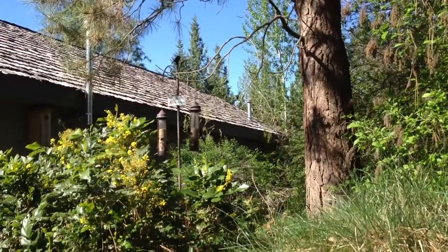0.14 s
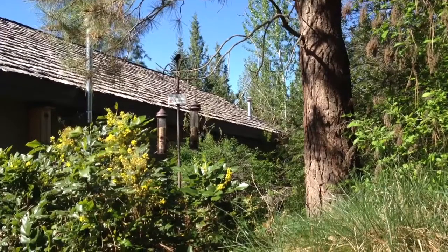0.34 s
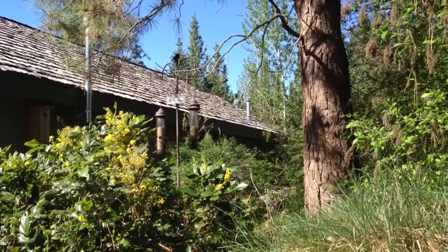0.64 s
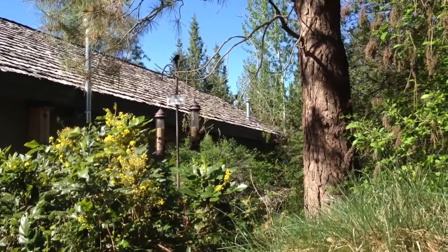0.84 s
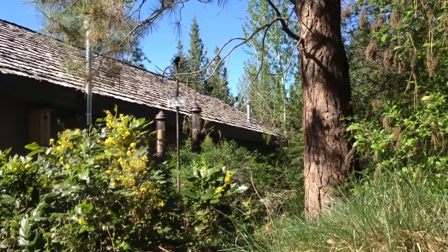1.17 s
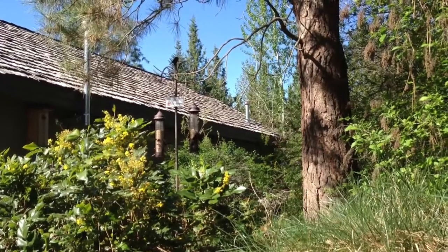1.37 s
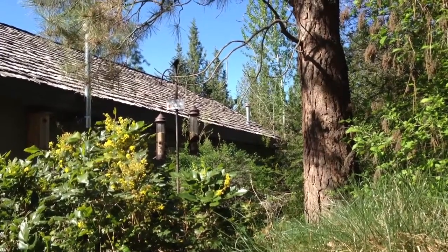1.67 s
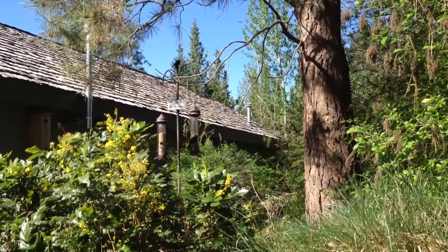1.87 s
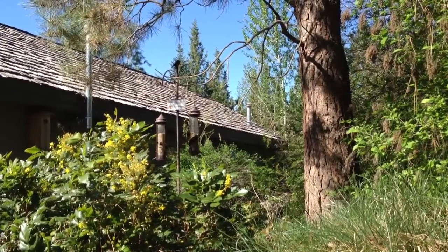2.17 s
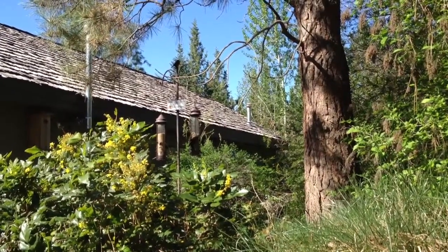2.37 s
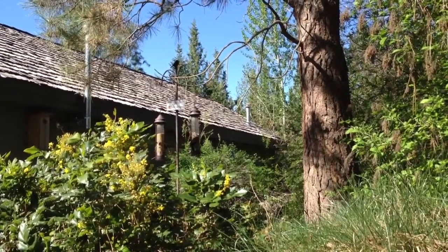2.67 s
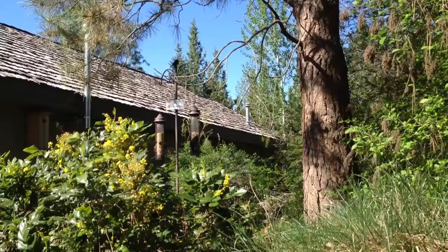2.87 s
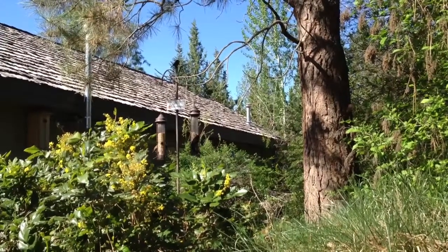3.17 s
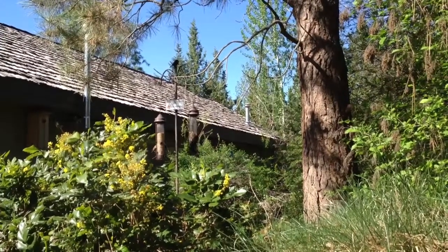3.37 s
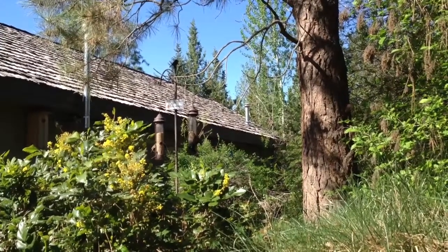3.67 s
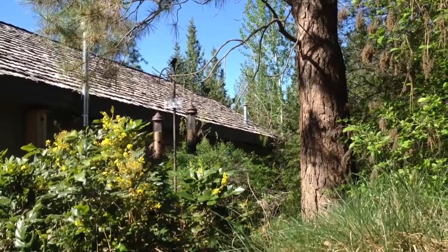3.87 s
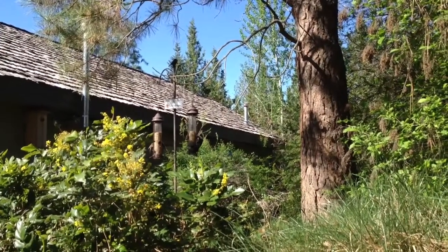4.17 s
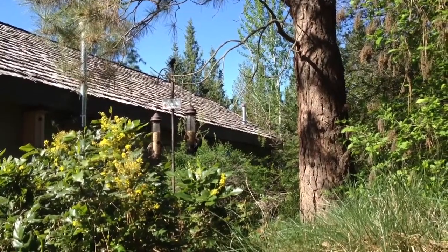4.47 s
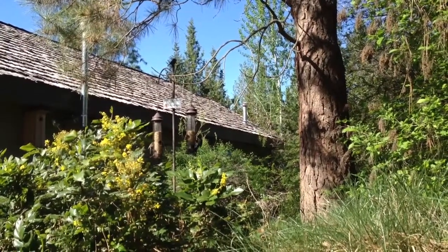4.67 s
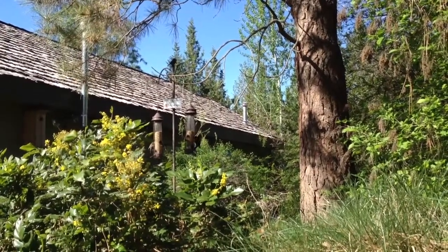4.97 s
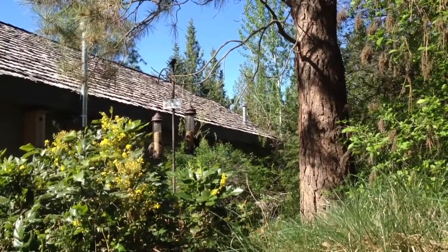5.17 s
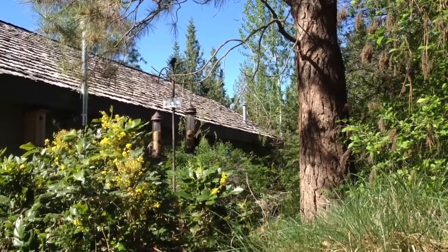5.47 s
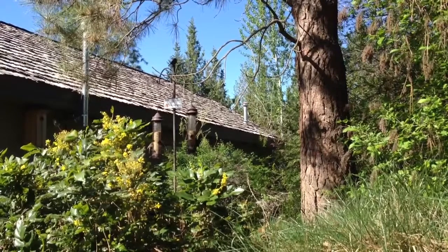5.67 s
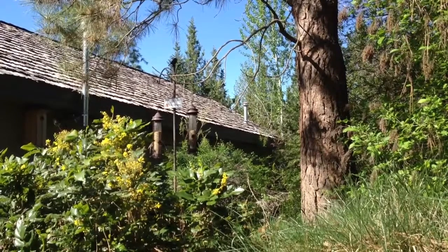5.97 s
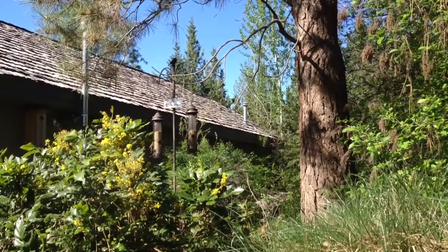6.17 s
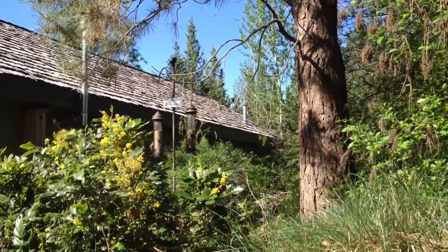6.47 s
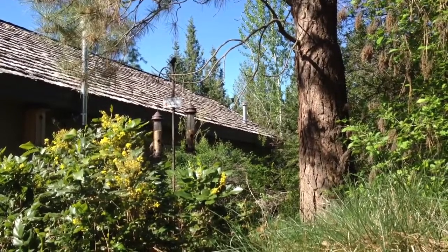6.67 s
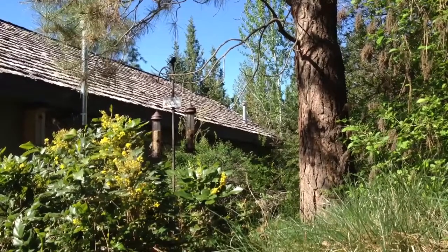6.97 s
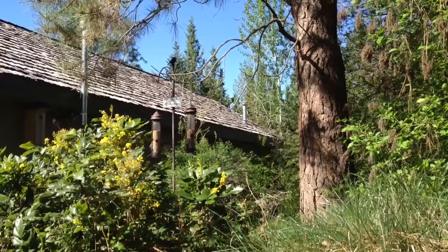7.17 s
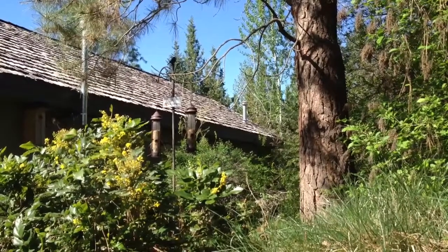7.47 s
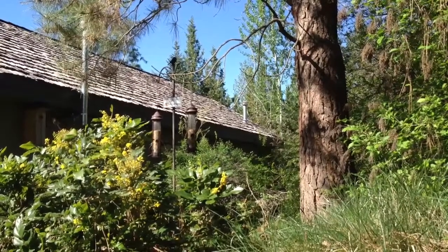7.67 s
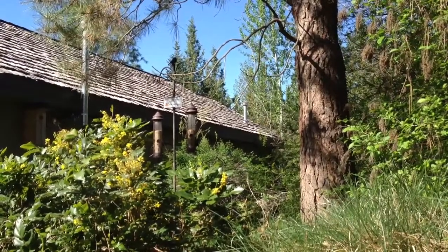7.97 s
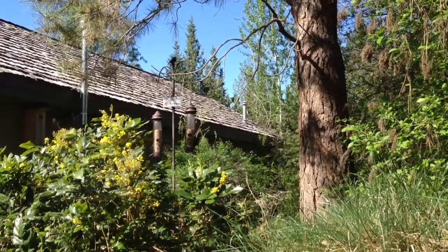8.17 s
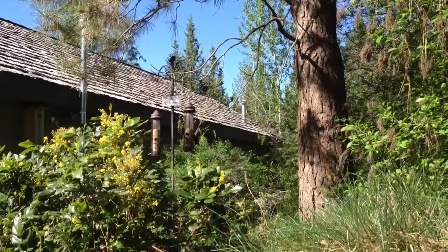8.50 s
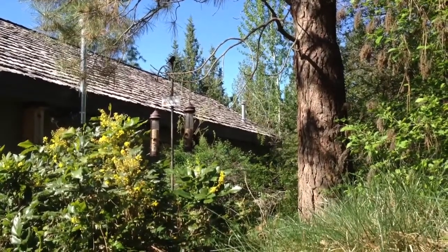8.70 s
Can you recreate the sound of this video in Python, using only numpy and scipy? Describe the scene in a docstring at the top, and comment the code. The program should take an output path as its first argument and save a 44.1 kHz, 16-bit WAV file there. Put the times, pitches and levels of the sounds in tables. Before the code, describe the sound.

Many small songbirds chirp, twitter and whistle in a garden, with a few brief wing flutters over a soft hush of distant air.

```python
"""Songbirds call around garden feeders over a steady hush of distant air, each voice a vibrating syrinx.
Chips, twits and falling "tew" calls open the scene, with wing flutters and two long finch whistles.
From about 2.5 s the twitter thickens while farther birds wheeze and sing low, fluted notes.
After 5 s the whistles return, loudest near 7 s; hard chips, a wheeze and a fluted note come at the end.
Throughout, a house wall, trunks and conifer foliage reflect and scatter the calls."""
import sys
import numpy as np
from scipy import signal
from scipy.fft import rfft, irfft, next_fast_len
from scipy.io import wavfile
from scipy.ndimage import map_coordinates

SR = 44100
rng = np.random.default_rng(int(sys.argv[2]) if len(sys.argv) > 2 else 0)


def unload_audio(sound):
    """Save the sound as a 16-bit wav file, at the path given as the first command line argument."""
    columns = np.transpose(np.atleast_2d(sound))
    # keep every value between -1 and 1, then stretch to whole-number steps
    steps = np.round(np.clip(columns, -1, 1) * 32767)
    wavfile.write(sys.argv[1], SR, steps.astype(np.int16))


N = 389844
TIME = np.arange(N) / SR

# falling "tew" calls: (time [s], level [dB])
TEW_CALLS = [(.26, -54), (1.265, -52), (2.212, -55.5), (2.885, -52), (4.205, -56), (5.182, -52.5),
             (6.127, -53), (7.09, -57), (7.762, -51.5), (8.53, -55.5)]
# harmonics 1-3 of a nearly pure voice: (level [dB])
PURE_HARMONICS = [0, -35, -32]


def from_db(db):
    """Amplitude ratio of a level in decibels."""
    return 10 ** (np.asarray(db) / 20)


def rms_one(x):
    """Normalisation to unit mean power."""
    return x / np.sqrt(np.mean(x ** 2) + 1e-20)


def at_hz(points, hz):
    """Spectral level, interpolated on a log-frequency axis."""
    known_hz, db = np.transpose(points)
    return np.interp(np.log(np.maximum(hz, 1)), np.log(known_hz), db)


def coloured_noise(spectrum):
    """Spectral shaping of white noise, at unit power."""
    gain = from_db(at_hz(spectrum, np.fft.rfftfreq(N, 1 / SR)))
    return rms_one(irfft(rfft(rng.standard_normal(N)) * gain, N))


def waver(t, rate, size=2048):
    """Smooth random modulation of spread about 1, with `rate` new values a second."""
    return map_coordinates(rng.standard_normal(size), [(t - t[0]) * rate], order=3, mode="wrap")


def add(out, t, sound):
    """Superposition of a sound onto the mix, from time t[0]."""
    first = int(round(t[0] * SR))
    part = sound[:max(N - first, 0)]
    out[first:first + len(part)] += part


def read_curve(rows, start=0):
    """Linear interpolation of breakpoints: sample times, then each column."""
    s, *columns = np.transpose(rows)
    end = start + max(s[-1], s[0] + .01)
    t = np.arange(max(int((start + s[0]) * SR), 0), int(end * SR)) / SR
    return t, *[np.interp(t - start, s, c) for c in columns]


def soft_ends(t, edge_s):
    """Raised-cosine gate against clicks."""
    return np.sin(np.pi / 2 * np.clip(np.minimum(t - t[0], t[-1] - t) / edge_s, 0, 1)) ** 2


def distant_air(level_db=-61):
    """Stationary broadband noise: the hush of distant air."""
    # hush spectrum: (frequency [Hz], relative density [dB])
    spectrum = [(25, -39), (45, -22), (69, -16.5), (119, -5.5), (200, -2), (378, -8), (900, -8.5),
                (1900, -10), (3000, -18), (5000, -21), (7500, -24), (9700, -30), (12000, -25), (15400, -26)]
    return from_db(level_db) * coloured_noise(spectrum)


def garden(x, near_db, near_t60, far_db, far_t60, count=30):
    """Reverberation: sparse reflections off ground, wall and trunks, then diffuse scatter from trees."""
    t = TIME[:SR]
    near = np.zeros(SR)
    lags = (np.arange(count) + rng.uniform(.3, 1, count)) * .0028
    near[(lags * SR).astype(int)] = rng.choice([-1, 1], count) * from_db(-60 * lags / near_t60)
    far = rng.standard_normal(SR) * from_db(-60 * t / far_t60) * (1 - np.exp(-t / 0.034))
    response = from_db(near_db) * near / np.linalg.norm(near)
    response += from_db(far_db) * far / np.linalg.norm(far)
    response[0] += 1   # direct path
    return signal.fftconvolve(x, response / np.linalg.norm(response))[:N]


def house_wall(x, lag_s=.0095, echo_db=4.0):
    """Comb filtering by one strong reflection off the wall behind the feeders."""
    return x + from_db(echo_db) * np.interp(TIME - lag_s, TIME, x, left=0)


def beak(x):
    """Radiation from a tiny opening: no bass, one band of overtones favoured, the highest dulled."""
    # transmission of beak and air: (frequency [Hz], gain [dB])
    response = [(300, -69), (1000, 3.5), (8000, -0.5), (9700, -10.5), (11600, 6.5), (13200, 1.5),
                (15000, -3)]
    size = next_fast_len(N + SR // 10)
    gain = from_db(at_hz(response, np.fft.rfftfreq(size, 1 / SR)))
    return irfft(rfft(x, size) * gain, size)[:N]


def syrinx(t, hz, db, rasp, harmonics_db, grit=0, tremor=0.0018, grit_rate=7500):
    """A modulated oscillator: rasp shakes pitch and amplitude, grit spreads sidebands of hiss."""
    rasp_swing, rasp_rate = 0.0707, 900
    shake = rasp * waver(t, rasp_rate)
    phase = 2 * np.pi * np.cumsum(hz * (1 + rasp_swing * shake + tremor * waver(t, 91.9))) / SR
    tone = sum(from_db(h) * np.sin(k * phase) * (k * hz < SR / 2) for k, h in enumerate(harmonics_db, 1))
    turbulence = 1 + grit * waver(t, grit_rate)
    strength = from_db(db + 6 * rasp * waver(t, rasp_rate))
    return np.sqrt(2) * tone * turbulence * strength * soft_ends(t, 0.00022)


def sing(note, rows, **manner):
    """Superposition of one note per row, all in the same manner."""
    out = np.zeros(N)
    for row in rows:
        add(out, *note(*row, **manner))
    return out


def repeated_call(shape, events, harmonics_db, pitch_spread=0.00912, **voice):
    """Transposition: one contour, sung a little higher or lower each time."""
    out = np.zeros(N)
    for start, level_db in events:
        t, hz, db = read_curve(shape, start)
        hz *= 1 + pitch_spread * rng.standard_normal()
        add(out, t, syrinx(t, hz, db + level_db, harmonics_db=harmonics_db, **voice))
    return out


def distant_chorus(count=30, level_db=-65, pitch_hz=4400, spread=0.12, rasp=0.48, answer_within_s=.3):
    """Random linear sweeps: birds deep in the trees answer the tew calls."""
    out = np.zeros(N)
    for k, (when, size, high, bend) in enumerate(rng.uniform(-1, 1, (count, 4))):
        start = TEW_CALLS[k % len(TEW_CALLS)][0] + answer_within_s * (when + 1) / 2
        t, along = read_curve([(0, -1), (0.082 + 0.042 * size, 1)], start)
        hz = pitch_hz * (1 + spread * (high + bend * along))
        add(out, t, syrinx(t, hz, level_db + 3 * size - 8 * along ** 2, rasp, PURE_HARMONICS))
    return out


def wheezes(climb_hz_per_s=57, top_hz=396.5, jitter=0.0397, wander=0.01072, flicker_db=2.0, throb_db=4.0):
    """Source and filter: the throat shapes the harmonics of quickening syrinx pulses; uneven ones rasp."""
    # nasal calls: (time [s], length [s], opening pulse rate [Hz], level [dB], roughness [0-1])
    calls = [(2.551, 0.85, 365, -61.5, .45), (3.254, 0.41, 369, -63.5, 0.54),
             (3.66, .58, 372.5, -54.5, 0.41), (4.19, 0.42, 376, -47.5, 0.92),
             (8.478, .4, 374.5, -56.5, 0.42)]
    # throat resonances: (frequency [Hz], gain [dB])
    throat = [(1200, -21.5), (2000, -14.5), (2350, -10), (2720, 3), (3100, -5), (3450, -1.5), (3850, -1),
              (4300, -2.5), (4800, -5.5), (5500, -10), (6200, -21.5), (11000, -42)]
    out = np.zeros(N)
    for start, length, opening_hz, db, rough in calls:
        t, age = read_curve([(0, 0), (length, length)], start)
        hz = np.minimum(opening_hz + climb_hz_per_s * age, top_hz)
        wobble = 1 + jitter * rough * waver(t, 330) + wander * waver(t, 20)
        phase = 2 * np.pi * np.cumsum(hz * wobble) / SR
        stack = 0
        for k in range(1, 26):
            line_db = at_hz(throat, k * hz) + flicker_db * waver(t, 13.38)
            stack += from_db(line_db) * np.sin(k * phase + rng.uniform(0, 2 * np.pi))
        uneven = from_db(throb_db * rough * waver(t, 165.3))
        add(out, t, rms_one(stack * uneven) * from_db(db) * soft_ends(t, 0.035))
    return out


def mellow_note(start, length, pitch_hz, level_db, rasp, sag, fade_s=.03):
    """A downward glide under a soft envelope; sag is the share of pitch lost."""
    high, low = pitch_hz * (1 + sag / 2), pitch_hz * (1 - sag / 2)
    t, hz, db = read_curve([(-fade_s, high, -22), (0, high, -7), (length / 2, pitch_hz, 0),
                            (length, low, -6), (length + fade_s, low, -22)], start)
    return t, syrinx(t, hz, level_db + db, rasp, PURE_HARMONICS)


def low_song():
    """A farther bird's near-sinusoidal notes, and slides that random modulation makes burry."""
    # fluted notes: (time [s], length [s], pitch [Hz], level [dB], rasp [0-1])
    fluted = [(2.664, 0.057, 1412, -57, 0.093), (2.849, 0.062, 1961, -48, 0.018),
              (3.44, 0.12, 1443, -52, .03), (3.859, 0.118, 1579, -45, 0.063),
              (4.131, 0.085, 1120, -60, 0.54), (4.302, 0.086, 1203, -56.5, .1),
              (4.565, 0.061, 2169, -45.5, 0.28), (4.57, 0.025, 2383, -40.5, .37),
              (4.727, 0.051, 1134, -58, 0.14), (4.985, 0.13, 1209, -50.5, 0.029),
              (8.535, 0.072, 1499, -57.5, 0.32), (8.786, 0.071, 1555, -42.5, 0.033)]
    # down-slides: (time [s], length [s], pitch [Hz], level [dB])
    burrs = [(2.673, .069, 2145, -60.5), (3.378, .054, 2105, -56.5), (3.625, 0.052, 2145, -50.5),
             (6.655, 0.027, 2160, -59.5)]
    return sing(mellow_note, fluted, sag=0.036) + sing(mellow_note, burrs, sag=0.173, rasp=0.57)


def flutters(beat_hz=24):
    """Amplitude-modulated noise: feathers swish once per wing beat."""
    # wing bursts: (time [s], length [s], level [dB])
    bursts = [(0.4, 0.081, -59.5), (0.97, 0.034, -52), (1.845, 0.091, -54.5), (4.033, 0.093, -53.5),
              (7.693, 0.079, -57.5), (8.454, 0.061, -47.5)]
    # feather noise: (frequency [Hz], relative density [dB])
    spectrum = [(150, -46), (600, -10), (1500, -16), (3500, -8.5), (5500, -12), (8000, -18), (10000, -21),
                (14000, -33)]
    swell = sum(from_db(db) * np.sin(np.pi * np.clip((TIME - start) / length, 0, 1))
                for start, length, db in bursts)
    return swell * (1 + .4 * np.sin(2 * np.pi * beat_hz * TIME)) * coloured_noise(spectrum)


def bent_note(start, length, pitch_hz, level_db, rasp, slope, arch, ends_db=-6):
    """A parabolic sweep: slope tilts the pitch, arch lowers both ends, as shares of the middle pitch."""
    # harmonics 1-3: (level [dB])
    harmonics = [0.5, -24.5, -31]
    t, along = read_curve([(0, -1), (length, 1)], start)
    hz = pitch_hz * (1 + slope * along - arch * along ** 2)
    return t, syrinx(t, hz, level_db + ends_db * along ** 2, rasp, harmonics) * soft_ends(t, .002)


def twitter():
    """Frequency modulation gives five kinds of small note, each with its own bend."""
    # rough chirps, arched peeps, thin upsweeps: (time [s], length [s], pitch [Hz], level [dB])
    falls = [(.365, 0.088, 3695, -57.5), (1.456, 0.038, 4240, -58), (2.402, 0.036, 8800, -59),
             (2.555, 0.12, 4010, -52), (3.791, 0.051, 4400, -48), (4.203, 0.021, 4630, -52),
             (5.398, .088, 3470, -59), (6.338, 0.044, 4320, -51), (6.409, 0.068, 2950, -60),
             (7.881, 0.035, 4085, -47), (8.579, 0.032, 3500, -56), (8.677, .025, 4050, -56)]
    rises = [(1.994, 0.1, 4600, -64.5), (2.492, 0.096, 4410, -51), (2.801, .04, 4370, -48),
             (4.142, 0.069, 2170, -56)]
    peeps = [(.077, 0.013, 4920, -46), (2.362, 0.0214, 9730, -50), (6.477, .029, 4097, -47),
             (6.517, .038, 4930, -56.5), (7.711, 0.037, 4820, -45), (8.174, 0.016, 5040, -47)]
    upsweeps = [(2.757, .05, 7670, -50), (2.806, 0.032, 8430, -52), (4.56, 0.09, 8630, -52.5),
                (4.585, 0.11, 8110, -52.5), (6.908, 0.056, 7600, -50.5), (6.955, .036, 8070, -57)]
    # drawn-out notes: (time [s], length [s], pitch [Hz], level [dB], rasp [0-1])
    held = [(2.505, .055, 6450, -50, 0.17), (2.551, .12, 6020, -46, 0.12), (2.611, .24, 4260, -49.5, 0.09),
            (2.707, 0.056, 6250, -53.5, 0), (3.078, 0.18, 4750, -58, 0.62),
            (4.006, 0.13, 4780, -49.5, 0.21), (4.445, 0.06, 4800, -41, 0.37),
            (4.506, 0.095, 7600, -51, 0.55), (6.724, .13, 4500, -53.5, .4),
            (6.949, 0.088, 5930, -53.5, 0.34), (7.015, 0.069, 6700, -54, 0)]
    return (sing(bent_note, falls, rasp=0.8, slope=-0.097, arch=0.0031)
            + sing(bent_note, rises, rasp=1.0, slope=0.13, arch=0.006)
            + sing(bent_note, peeps, rasp=0.31, slope=0.0032, arch=0.074)
            + sing(bent_note, upsweeps, rasp=0.28, slope=0.093, arch=0.046)
            + sing(bent_note, held, slope=0.0089, arch=0.0127))


def slurs():
    """Biphonation: the two sides of the syrinx each sing a falling line."""
    # contours of the two sides: (offset [s], pitch [Hz], level [dB])
    upper = [(0, 6050, -18), (.015, 5970, -3.5), (.04, 5810, -11), (.06, 5130, -1), (.076, 4500, 13.5),
             (.09, 4000, -10)]
    lower = [(0.017, 5700, -29), (.036, 4690, 4.5), (.052, 4150, 0.5), (0.083, 3717, 5.5)]
    # slurs: (time [s], level [dB])
    calls = [(6.252, -61), (7.405, -57), (8.328, -57.5)]
    return sum(repeated_call(side, calls, PURE_HARMONICS, rasp=0.16) for side in (upper, lower))


def tews():
    """A fast downward frequency sweep, heard as "tew"."""
    # contour: (offset [s], pitch [Hz], level [dB])
    shape = [(-.026, 6200, -7), (-.008, 6000, -39.5), (0, 4750, 11), (.007, 4950, 1), (.022, 4450, 8.5),
             (.04, 3850, -3.5), (.075, 3350, -1.5)]
    return repeated_call(shape, TEW_CALLS, PURE_HARMONICS, rasp=0.564, grit=0.074)


def twits():
    """Rising sweeps with wide noise sidebands, heard as raspy twits."""
    # contour: (offset [s], pitch [Hz], level [dB])
    shape = [(-.006, 3670, -7), (0, 3615, 4), (.008, 4025, 0), (.017, 4280, 1), (.03, 4370, 5.5),
             (.043, 4510, -4.5), (.058, 4410, 3)]
    # twits: (time [s], level [dB])
    calls = [(.068, -53), (3.725, -52), (3.77, -57), (4.528, -42), (4.695, -42.5), (4.909, -40.5),
             (5.074, -40.5), (8.172, -51.5)]
    # harmonics 1-3: (level [dB])
    harmonics = [0, -32, -33]
    return repeated_call(shape, calls, harmonics, rasp=.56, grit=.22, grit_rate=12000)


def chips():
    """Hard, falling transients whose second harmonic dominates."""
    # contour: (offset [s], pitch [Hz], level [dB])
    shape = [(0, 2210, -12.5), (.004, 1933, -4.5), (.009, 1850, -7.5), (.014, 1590, -6)]
    # chips: (time [s], level [dB])
    calls = [(.008, -43.5), (.95, -50), (1.858, -37), (1.897, -45.5), (4.04, -40), (5.044, -32),
             (6.79, -39), (8.128, -33), (8.14, -45), (8.444, -28)]
    # harmonics 1-4: (level [dB])
    harmonics = [-20, -3.5, -26.5, -32.5]
    return repeated_call(shape, calls, harmonics, rasp=0.25, grit=0.12)


def whistles(hoarse=0.73, clear_after_s=0.1, steady_rasp=0.066, firm_db=-48, firm_range_db=4):
    """Exponential relaxation drops a finch's pitch to a held note; a weakly blown start is hoarse."""
    # long whistles: (time [s], length [s], opening pitch [Hz], held pitch [Hz], closing lift [Hz],
    # opening level [dB], late level [dB])
    calls = [ (.455, 0.35, 5950, 4162, 10, -58, -50), (1.103, 0.31, 6530, 4330, 251, -42, -33),
             (5.352, 0.38, 5870, 4260, -5, -51.5, -55), (6.857, .29, 5880, 4354, 170.5, -37, -30.5),
             (7.515, 0.27, 5350, 4195, 24.5, -53.5, -39.5)]
    # harmonics 1-3: (level [dB])
    harmonics = [0, -35, -35]
    attack_s, release_s, ends_db = 0.031, 0.041, -11.5
    settle_s, lift_s, wander = .04, 0.0697, 0.0041
    out = np.zeros(N)
    for start, length, opening_hz, held_hz, lift_hz, opening_db, late_db in calls:
        t, db = read_curve([(0, opening_db + ends_db), (attack_s, opening_db),
                            (length - release_s, late_db), (length, late_db + ends_db)], start)
        age = t - t[0]
        drop = (opening_hz - held_hz) * np.exp(-age / settle_s)
        kink = 0.727 * np.exp(-((age / length - .52) / 0.0916) ** 2)   # a brief, smaller lift midway
        lift = np.sin(np.pi / 2 * np.clip(1 - (length - age) / lift_s, 0, 1))
        hz = (held_hz + drop + lift_hz * (kink + lift)) * (1 + wander * waver(t, 40))
        weak = 1 / (0.5 + np.exp((db - firm_db) / firm_range_db))
        rasp = steady_rasp + hoarse * weak * np.exp(-(age / clear_after_s) ** 2)
        add(out, t, syrinx(t, hz, db, rasp, harmonics, grit=0.021, tremor=0.0041))
    return out


def scene():
    """Superposition of perches, each with its own echoes: dry in the open, smeared deep in foliage."""
    tew_calls, twit_calls = tews(), twits()
    at_feeders = house_wall(chips()) + slurs() + flutters()
    feeders = garden(at_feeders, near_db=-5, near_t60=.26, far_db=-13, far_t60=.6)
    bushes = garden(twit_calls, near_db=2, near_t60=0.13, far_db=-14, far_t60=0.9)
    shrubs = garden(tew_calls + twitter(), near_db=1.0, near_t60=0.22, far_db=-8, far_t60=0.5)
    treetops = garden(whistles(), near_db=3.5, near_t60=0.3, far_db=-15.5, far_t60=0.44)
    far_tree = garden(low_song(), near_db=-2.0, near_t60=0.38, far_db=-7, far_t60=0.51)
    thicket = garden(wheezes() + distant_chorus(), near_db=5, near_t60=0.21, far_db=-4.5, far_t60=1.0)
    birds = beak(feeders + bushes + shrubs + treetops + far_tree + thicket)
    return (birds + distant_air())[None]


def record(dry):
    """Band limiting: a steep elliptic low-pass cuts the highest treble."""
    cutoff_hz = 15400
    return signal.sosfilt(signal.ellip(12, .1, 70, cutoff_hz, fs=SR, output="sos"), dry)


dry = scene()
out = record(dry)
unload_audio(out)
```